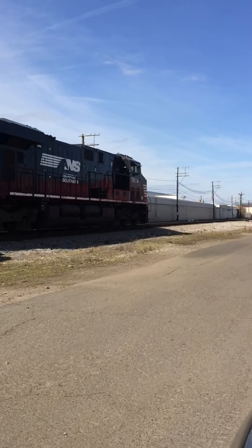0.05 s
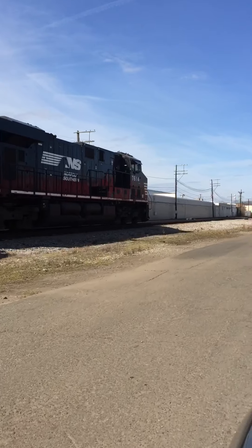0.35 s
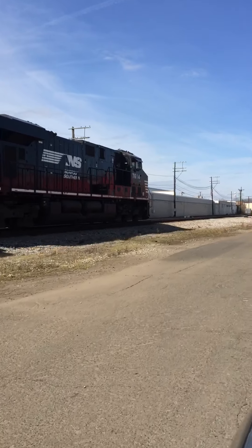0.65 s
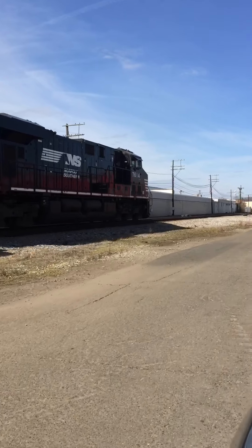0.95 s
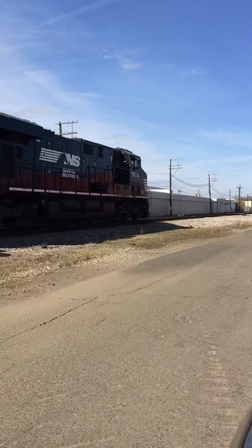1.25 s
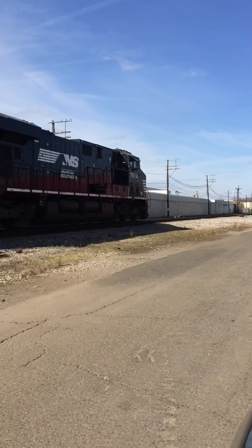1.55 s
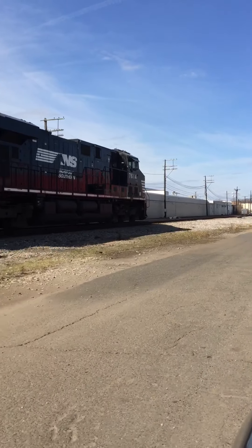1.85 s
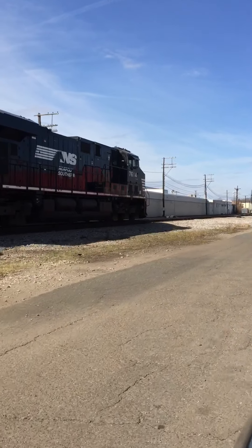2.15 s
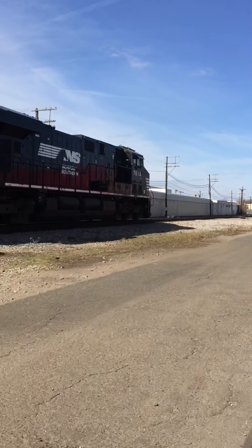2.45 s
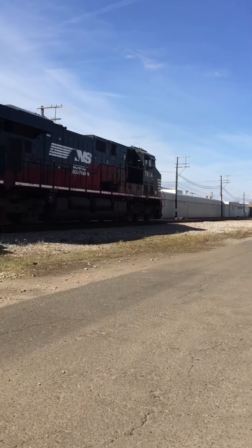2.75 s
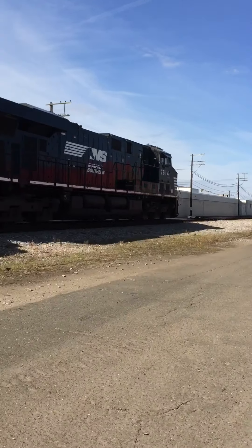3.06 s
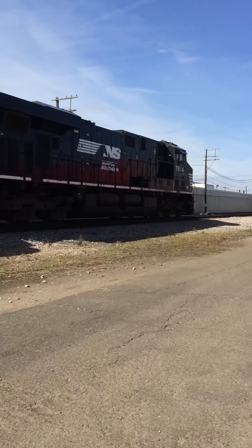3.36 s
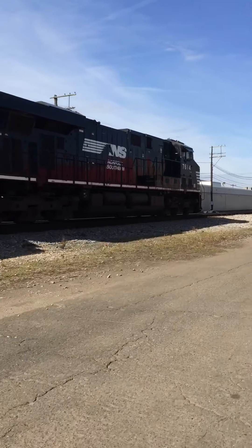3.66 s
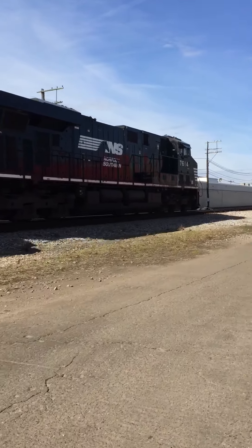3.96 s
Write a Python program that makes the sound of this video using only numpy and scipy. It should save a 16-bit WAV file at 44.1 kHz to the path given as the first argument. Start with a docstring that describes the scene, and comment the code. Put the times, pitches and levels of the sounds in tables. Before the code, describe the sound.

Diesel locomotive chugging and whining over tyre rumble, until a sudden hissing air release.

```python
"""A car coasts along a road beside a diesel locomotive, heard from the open window.
From the start, the car's engine note sinks over tyre rumble while the diesel chugs, whines and hisses.
Now and then the tyres thud over cracks. Near 2.8 seconds an air valve opens: a loud rush that fades
as the pressure drops, with a hollow whistle sputtering down in steps."""
import sys
import numpy as np
from scipy import signal
from scipy.fft import rfft, irfft
from scipy.io import wavfile
from scipy.ndimage import uniform_filter1d, map_coordinates

SR = 44100
rng = np.random.default_rng(int(sys.argv[2]) if len(sys.argv) > 2 else 0)


def to_wav(s):
    """Save 16-bit WAV."""
    ch = np.atleast_2d(s).T  # columns
    pcm = np.round(np.clip(ch, -1, 1) * 32767)  # PCM
    wavfile.write(sys.argv[1], SR, pcm.astype(np.int16))


N = 176400  # 4 seconds

# The car engine's note. Each row: time in seconds, firings per second.
ENGINE_PITCH = [(0, 73.92), (1.2, 69.18), (2.1, 64.5), (3.3, 62.32), (4, 57.4)]
# How strongly the engine booms. Each row: time in seconds, relative level in dB.
BOOM_LEVEL = [(0, -23), (.17, -16), (.31, -42), (.48, -11), (.8, -25.5), (.95, -24), (1.2, -10.5),
              (1.36, -19.5), (1.52, -14.5), (1.77, -25.5), (1.96, -12), (2.23, -21), (2.43, -14.5),
              (2.58, -25), (2.78, -12), (2.95, -23), (3.1, -14), (3.36, -21), (3.53, -15), (3.7, -20.5),
              (4, -21)]
# The engine's higher notes. Each row: multiple of the firing rate, level in dB against the rumble.
OVERTONES = [(1.5, -12), (3, -13.5)]
# Tyre rumble, from low to high. Each row: frequency in Hz, relative level in dB.
RUMBLE_SPECTRUM = [(20, -32), (30, -25), (40, -13), (50, -0.5), (62, -2.5), (80, 0.5), (105, -3), (130, -6),
                   (165, -4), (205, -1), (240, -7.5), (300, -20.5), (500, -30), (1000, -66)]
# Loudness of the rumble and the higher notes. Each row: time in seconds, level in dB.
RUMBLE_LEVEL = [(0, -16.5), (2.3, -16.5), (2.65, -18.5), (2.9, -21), (4, -19.5)]
# Jolts over cracks in the asphalt. Each row: start in seconds, peak level in dB.
BUMPS = [(0.452, -14.5), (1.34, -17), (1.503, -20), (1.814, -14.5), (2.259, -15), (2.631, -13.5),
         (3.496, -12)]
# A hum, probably the tyres. Each row: time in seconds, pitch in Hz, level in dB.
TYRE_HUM = [(0, 690, -39), (.9, 675, -33.5), (1.9, 620, -36.5), (2.55, 558, -32.5), (3, 542, -44)]

# Rushing air at full pressure. Each row: frequency in Hz, relative level in dB.
AIR_SPECTRUM = [(500, -13), (1300, -10), (1680, 4.5), (2100, -1), (2600, 0), (3300, -5), (3800, -2.5),
                (4350, 2), (4750, -2), (5400, 1.5), (6100, 0), (7000, -7), (7900, -12), (8800, -12),
                (9500, -5.5), (10300, -12), (11400, -8), (12600, -18.5), (14000, -11.5), (15500, -21)]
# Strength of the air flow. Each row: time in seconds, level in dB.
FLOW_LEVEL = [(2.77, -25.5), (2.82, -23), (2.89, -20.5), (2.97, -23.5), (3.1, -25), (3.21, -26),
              (3.29, -27), (3.46, -27), (3.51, -30.5), (3.62, -29.5), (3.72, -32.5), (3.84, -29.5),
              (3.94, -32.5), (4, -31)]
# Spurts of whistle. Each row: middle and half-length in seconds, pitch and width in Hz, level in dB.
SPURTS = [(2.86, 0.13, 5900, 1200, -27.5), (3.203, .12, 5440, 850, -29), (3.48, .055, 4410, 420, -31),
          (3.62, 0.068, 4350, 430, -29.5), (3.705, 0.052, 3860, 480, -31.5), (3.825, .1, 3865, 520, -33)]

# The diesel's exhaust and engine case. Each row: frequency in Hz, relative level in dB.
DIESEL_SPECTRUM = [(60, -0.5), (200, -5.5), (275, 4.5), (335, 3), (370, 8), (445, -0.5), (500, -7.5),
                   (700, -27), (1500, -62)]
# Their loudness. Each row: time in seconds, level in dB.
DIESEL_LEVEL = [(0, -24), (2, -26), (2.65, -24.5), (3.1, -25.5), (3.55, -24), (4, -22.5)]
# Clatter of gears and fans. Each row: frequency in Hz, relative level in dB.
CLATTER_SPECTRUM = [(250, -4), (480, -2.5), (720, 2.5), (1050, 0.5), (1400, -1.5), (1650, -0.5), (1880, -2),
                    (2020, -11.5), (2400, -12), (2900, -15), (3300, -26.5), (5000, -49)]
# The locomotive's hiss. Each row: frequency in Hz, relative level in dB.
HISS_SPECTRUM = [(2000, -41), (3300, -5), (3900, 2), (4850, 1), (5500, 1.5), (6800, -4), (8000, -14.5),
                 (10500, -17), (11700, -14), (12500, -23), (15500, -33)]
# Its loudness. Each row: time in seconds, level in dB.
HISS_LEVEL = [(0, -46), (1.2, -45.5), (1.43, -46.5), (1.63, -46), (2.1, -47.5), (2.32, -44), (2.45, -46.5),
              (4, -42)]
# Thin ringing, probably wheels on the rail. Each row: pitch in Hz, width in Hz, relative level in dB.
WHEEL_RING = [(4466, 250, -6.5), (9940, 270, -23)]
# How that ringing swells within the hiss. Each row: time in seconds, level change in dB.
RING_SWELL = [(0, -1), (.35, 1.5), (1.45, -2.5), (2.3, 2), (4, -4)]
# Steady machine tones. Each row: pitch in Hz, level in dB.
WHINES = [(103.5, -29), (320, -39), (1620, -50), (1895, -42)]


def car(t, boom_db=-3):
    """The engine booms and slowly sinks in pitch; the tyres rumble on rough asphalt."""
    phase = turn(curve(ENGINE_PITCH, t) * (1 + 0.005 * wander(9.18)))
    boom = np.sqrt(2) * np.sin(phase) * gain(curve(BOOM_LEVEL, t) + boom_db)
    overtones = sum(gain(db + 1.17 * wander(10)) * np.sin(multiple * phase) for multiple, db in OVERTONES)
    rumble = colour(noise() * gain(0.5 * wander(20)), RUMBLE_SPECTRUM)
    return boom + (rumble + overtones) * gain(curve(RUMBLE_LEVEL, t))


def bumps(t, rise_s=0.011, band_hz=(65, 291)):
    """Each crack gives a short, dull thud through the tyres."""
    band = signal.butter(6, band_hz, "bandpass", fs=SR, output="sos")
    thud = unit(signal.sosfilt(band, noise()))
    push = 0
    for start, db in BUMPS:
        age = np.maximum(t - start, 0) / rise_s
        push += gain(db) * age * np.exp(1 - age)
    return thud * push


def air_release(t, start_s=2.763, opening_s=0.016, split_hz=4700, dulling_db_per_s=2.5):
    """The valve snaps open and the vent pipe rings; the jet of air fades and dulls as it whistles."""
    jet = colour(noise(), AIR_SPECTRUM)
    body = signal.sosfiltfilt(signal.butter(4, split_hz, fs=SR, output="sos"), jet)
    treble_db = -0.16 - dulling_db_per_s * np.maximum(t - start_s, 0)
    treble = (jet - body) * gain(treble_db + wander(14))
    flow_db = curve(FLOW_LEVEL, t) + 0.16 * wander(110)
    pipe = gain(-20.5 + flow_db / 2) * ring(hz=1677, width_hz=180)  # fades half as fast as the flow
    rush = (body + treble) * gain(flow_db) + pipe
    valve = np.clip((t - start_s) / opening_s, 0, 1)
    return valve * (rush + whistle(t))


def whistle(t, sag_hz_per_s=1800, octave_db=-14.5):
    """The vent sputters: each spurt swells, sags in pitch and dies, with a faint octave above."""
    out = 0
    for middle, half_length, pitch, width, db in SPURTS:
        hz = pitch - sag_hz_per_s * np.clip(t - middle, -half_length, half_length)
        tone = ring(hz, width) + gain(octave_db) * ring(2 * hz, 2 * width)
        swell = np.exp(-2 * ((t - middle) / half_length) ** 2)
        out += tone * gain(db) * swell
    return out


def locomotive(t, chug_hz=8.7, clatter_db=-28):
    """Exhaust, clatter and hiss throb with the diesel's beat; fans and gears whine, wheels ring."""
    beat = np.cos(turn(chug_hz * (1 + 0.075 * wander(4.43))))
    beat *= 1 + 0.45 * wander(8.8)  # some chugs are stronger
    exhaust = colour(noise() * (1 + 0.22 * beat), DIESEL_SPECTRUM) * gain(curve(DIESEL_LEVEL, t))
    rattle = noise() * (1 + 0.063 * beat) * gain(0.5 * wander(120))
    clatter = colour(rattle, CLATTER_SPECTRUM) * gain(clatter_db)
    hiss = colour(noise() * (1 + 0.07 * beat) * gain(0.92 * wander(90)), HISS_SPECTRUM)
    wheels = sum(gain(db) * ring(hz, width) for hz, width, db in WHEEL_RING) * gain(curve(RING_SWELL, t))
    ringing_hiss = (hiss + wheels) * gain(curve(HISS_LEVEL, t))
    whines = sum(gain(db) * whine(hz) for hz, db in WHINES)
    return exhaust + clatter + add_echoes(ringing_hiss, t) + whines


def whine(hz, flicker_db=3):
    """A machine tone that wavers a little in pitch and strength."""
    phase = turn(hz * (1 + 0.00331 * wander(40)))
    return unit(np.sin(phase) * gain(flicker_db * wander(20)))


def tyre_hum(t):
    """A grainy hum that sinks as the car slows, then dies away."""
    return ring(curve(TYRE_HUM, t), width_hz=86) * gain(curve(TYRE_HUM, t, column=2))


def add_echoes(x, t, count=8, delay_s=(0.001884, 0.012), relative_db=-19.5):
    """Sound bounces off the road, car door and locomotive; the paths drift as the car rolls on."""
    out = x
    for lag, drift in rng.random((count, 2)):
        delay = delay_s[0] + lag * (delay_s[1] - delay_s[0]) + 0.00007 * (2 * drift - 1) * t
        echo = map_coordinates(x, [(t - delay) * SR], order=3, mode="mirror")
        out = out + gain(relative_db) * echo
    return out / np.sqrt(1 + count * gain(2 * relative_db))  # keep about the same loudness


def ring(hz, width_hz):
    """A note kept ringing by random shaking; the wider it is, the breathier it sounds."""
    offset_hz = np.fft.fftfreq(N, 1 / SR)
    falloff = np.sqrt(1 + np.abs(2 * offset_hz / width_hz) ** 5)
    sway = np.fft.ifft((noise() + 1j * noise()) / falloff)
    return unit((sway * np.exp(1j * turn(hz))).real)


def colour(x, spectrum):
    """Shape a sound's lows and highs by a table, at strength 1."""
    rows = np.array(spectrum, float)
    hz = np.maximum(np.arange(N // 2 + 1) * SR / N, 1)
    db = np.interp(np.log(hz), np.log(rows[:, 0]), rows[:, 1])
    edge_fade = np.minimum(hz / rows[0, 0], 1) * np.minimum(rows[-1, 0] / hz, 1)
    return unit(irfft(rfft(x) * gain(db) * edge_fade ** 2, N))


def wander(rate):
    """A smooth random wobble of strength 1 that changes about rate times a second."""
    hold = max(int(SR / rate), 1)
    steps = np.repeat(noise()[:N // hold + 1], hold)[:N]
    return unit(uniform_filter1d(uniform_filter1d(steps, hold), hold))


def noise():
    """White noise: an even hiss."""
    return rng.standard_normal(N)


def turn(hz):
    """How far a wave of this pitch has turned (its phase), in radians."""
    return 2 * np.pi * np.cumsum(hz * np.ones(N)) / SR


def curve(table, t, column=1):
    """One column of a table, joined by straight lines in time."""
    rows = np.array(table, float)
    return np.interp(t, rows[:, 0], rows[:, column])


def gain(db):
    """Turn decibels into a number to multiply by."""
    return 10 ** (np.asarray(db) / 20)


def unit(x):
    """Scale to an average strength (rms) of 1."""
    return x / np.sqrt(np.mean(np.abs(x) ** 2))


def scene():
    """Car, locomotive and air valve in the open, in one channel."""
    t = np.arange(N) / SR
    return (car(t) + tyre_hum(t) + bumps(t) + locomotive(t) + add_echoes(air_release(t), t))[None]


def record(dry):
    """Cut away the highest treble, above 15700 Hz."""
    return signal.sosfilt(signal.ellip(10, 0.2, 80, 15700, fs=SR, output="sos"), dry)


dry = scene()
out = record(dry)
to_wav(out)
```